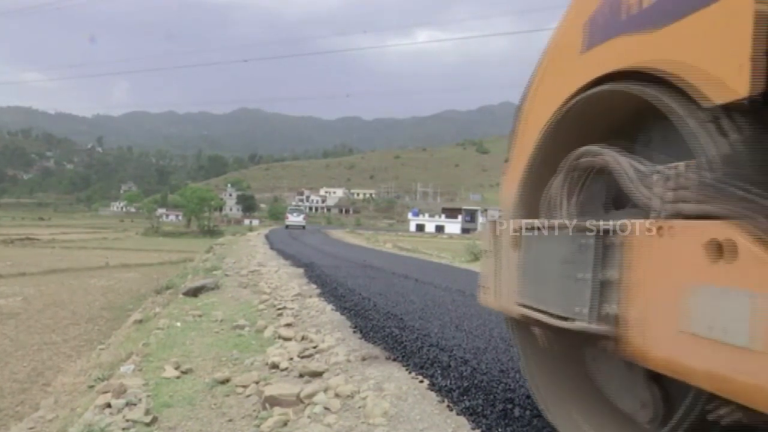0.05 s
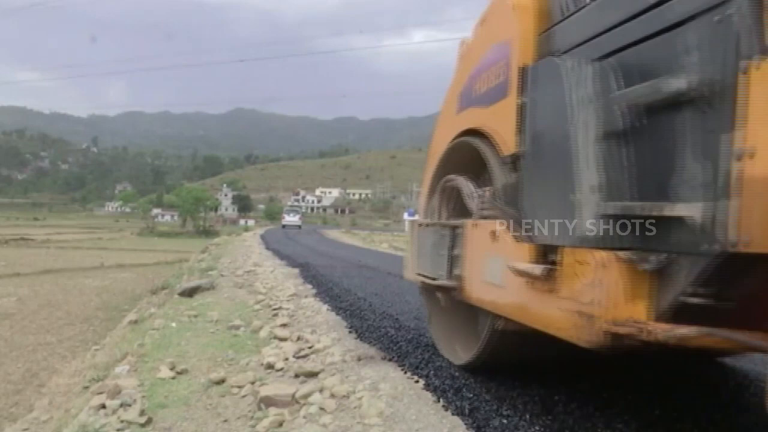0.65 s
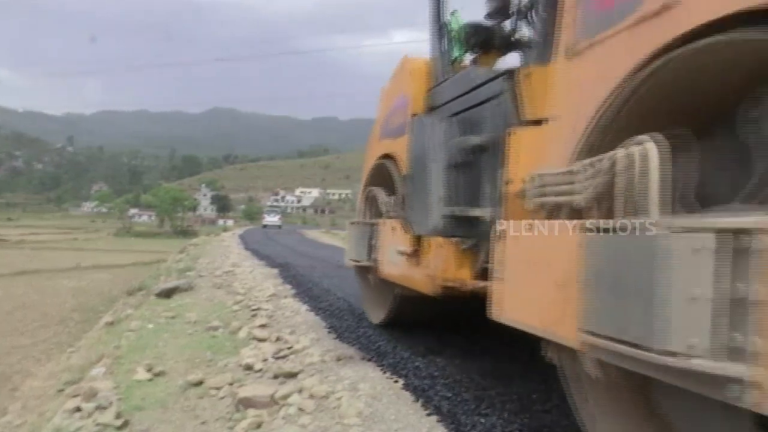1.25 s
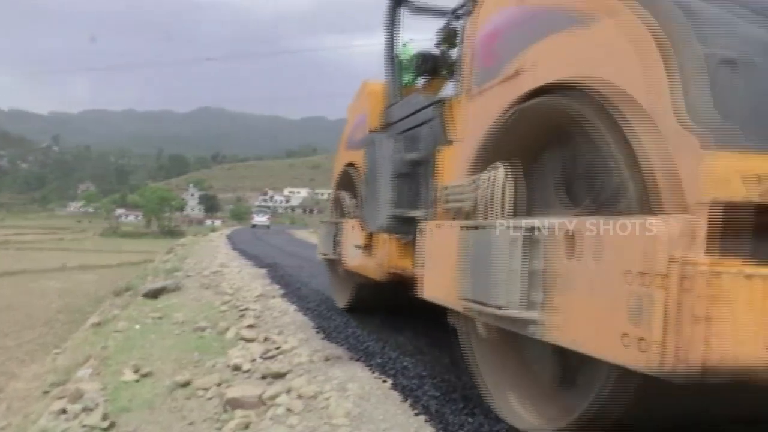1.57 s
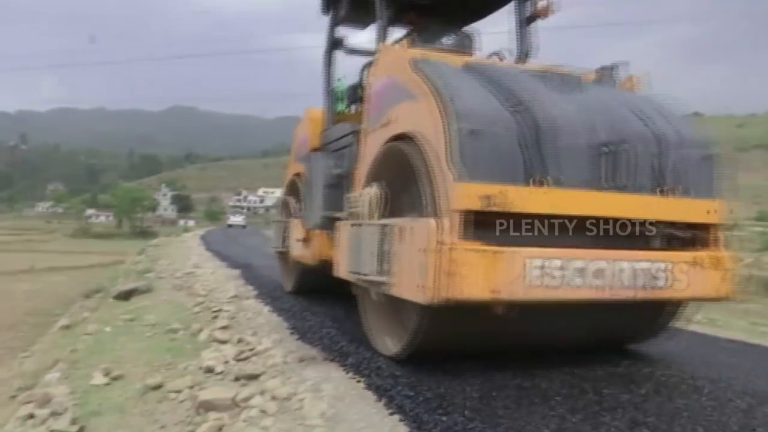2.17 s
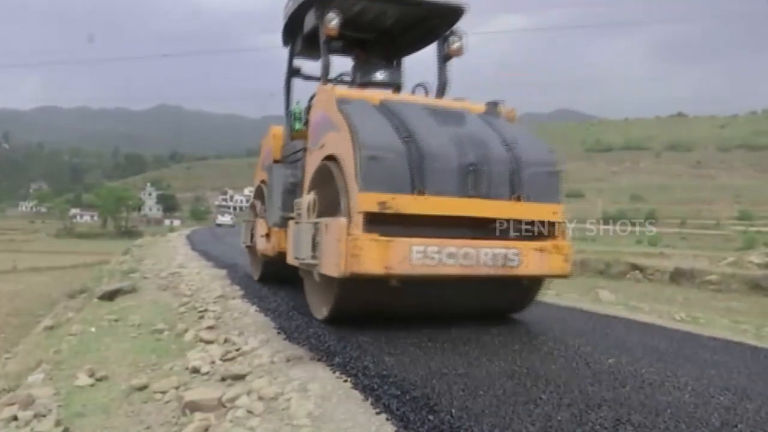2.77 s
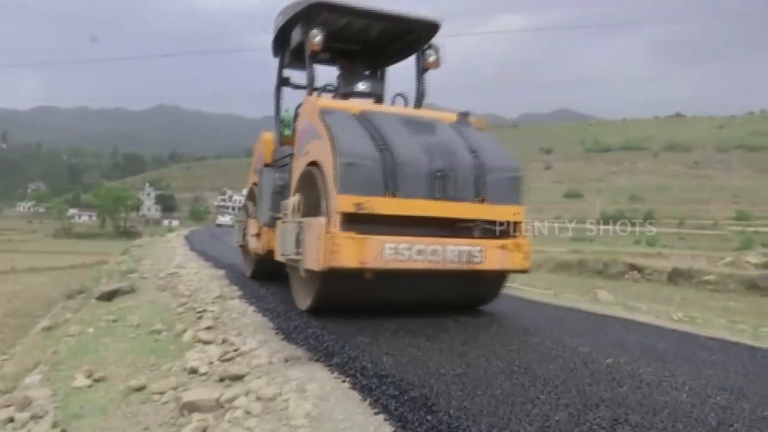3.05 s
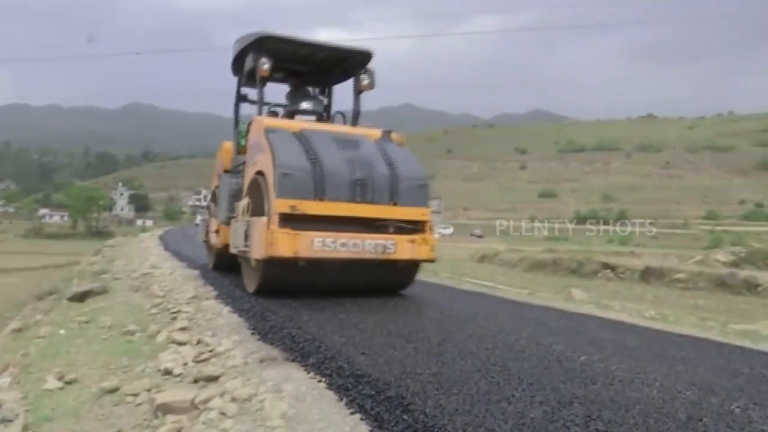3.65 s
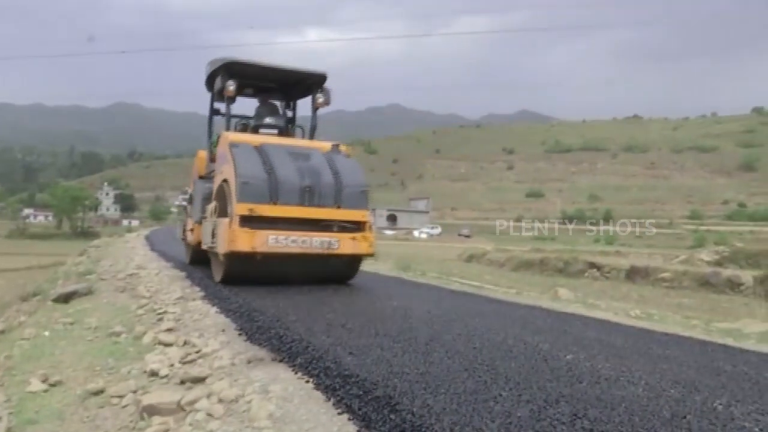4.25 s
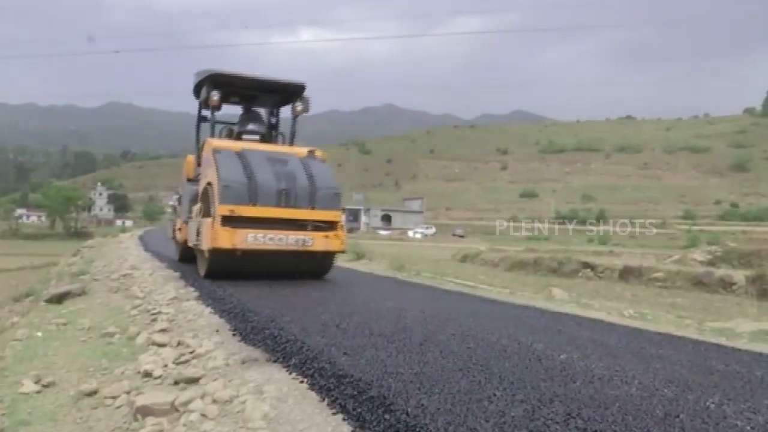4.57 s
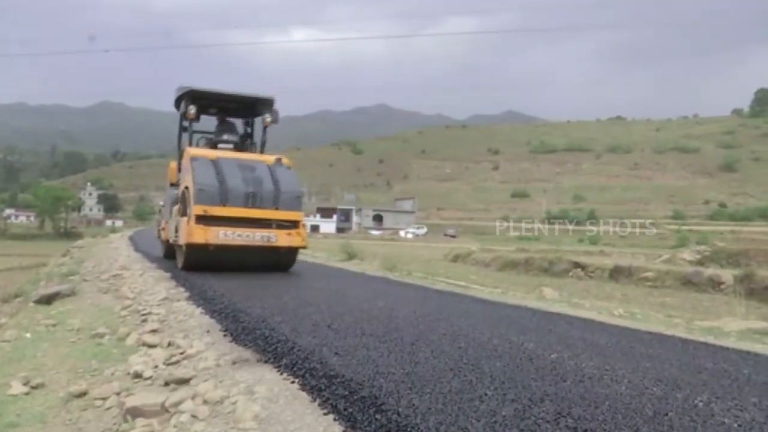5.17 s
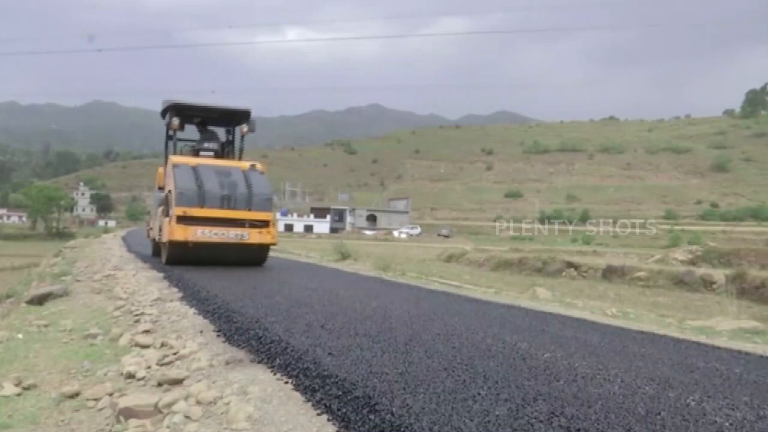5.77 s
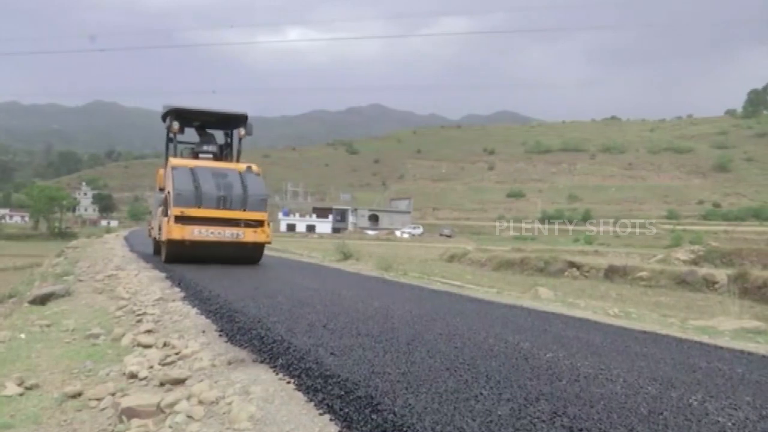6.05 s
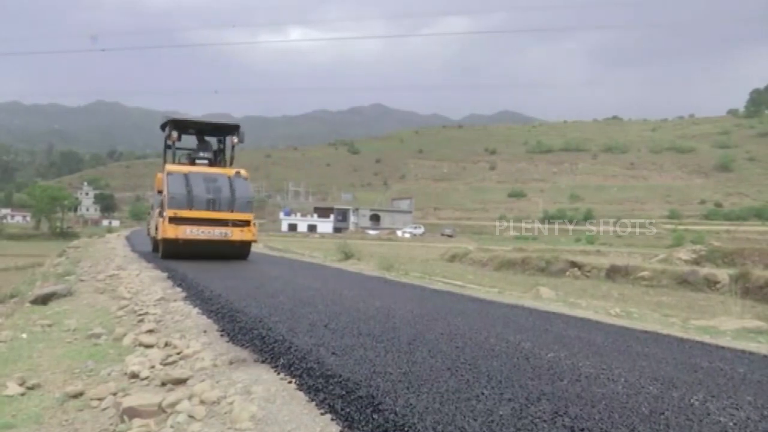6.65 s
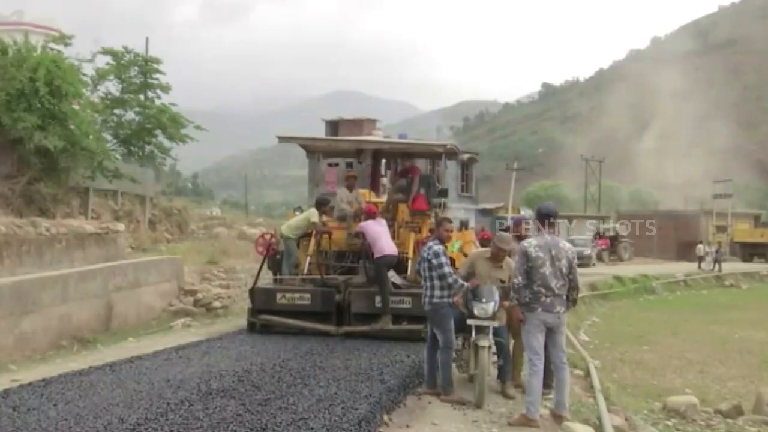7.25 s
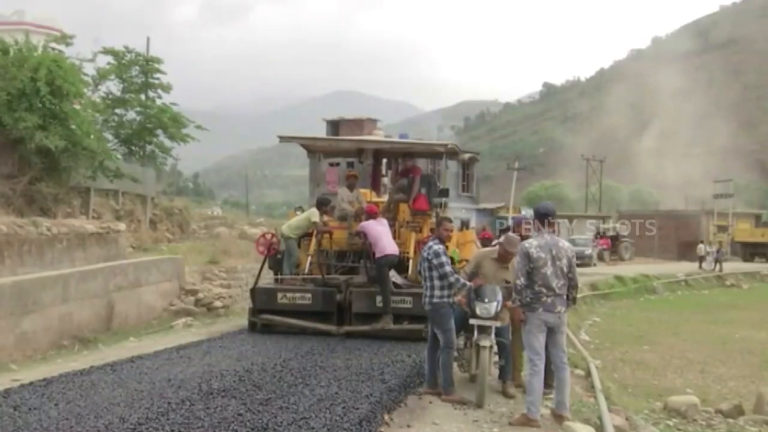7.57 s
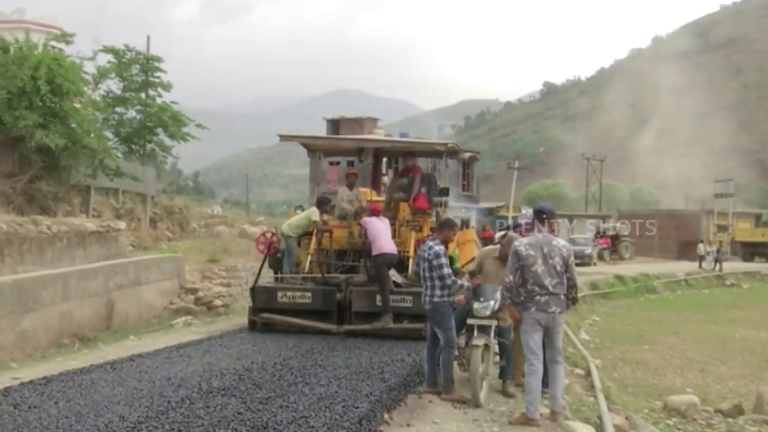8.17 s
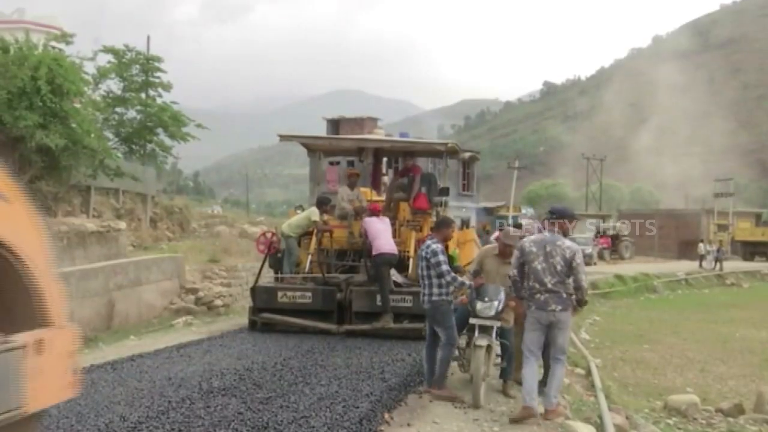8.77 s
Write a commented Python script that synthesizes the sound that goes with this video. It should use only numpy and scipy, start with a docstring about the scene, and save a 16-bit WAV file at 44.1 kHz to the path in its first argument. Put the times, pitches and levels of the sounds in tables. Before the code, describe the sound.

Steady diesel hum and clatter from a passing road roller, with surges of gritty tar hiss and cracking stones, stopping abruptly.

```python
"""Open country, on fresh asphalt: a tandem road roller backs past at arm's length and rolls slowly away.
Its four-cylinder diesel holds one speed; periodic firing makes the exhaust hum, the block knock and
the steel panels resonate, while the fan drones and the hydraulic drive whines. The wet drums hiss in
surges on hot tar, stones crack, and a scraper squeaks and rings. The sound stops dead, leaving only
a faint electronic hiss."""
import sys
import numpy as np
from scipy import signal
from scipy.fft import rfft, irfft, next_fast_len
from scipy.io import wavfile
from scipy.ndimage import uniform_filter1d

SR = 44100
rng = np.random.default_rng(int(sys.argv[2]) if len(sys.argv) > 2 else 0)


def to_wav(sig):
    """Store sig (one row per channel, or 1-D mono) as 16-bit WAV at the path in sys.argv[1].

    Samples outside -1..1 are clipped; the rate is SR.
    """
    pcm = np.clip(np.atleast_2d(sig), -1, 1) * 32767
    pcm = np.round(pcm).astype(np.int16)
    wavfile.write(sys.argv[1], SR, pcm.T)  # frames by channels


N = 397341
T = np.arange(N) / SR


def undb(db):
    """Amplitude ratio of a level in decibels."""
    return 10 ** (np.asarray(db) / 20)


def unit(x):
    """Normalisation to rms 1."""
    return x / np.sqrt(np.mean(x ** 2))


def curves(rows):
    """Linear interpolation of each column over time."""
    times, *columns = np.transpose(rows)
    return [np.interp(T, times, column) for column in columns]


def swell(time, half_length):
    """Gaussian envelope with peak 1."""
    return np.exp(-((T - time) / half_length) ** 2)


def noise():
    """Gaussian white noise."""
    return rng.standard_normal(N)


def wander(rate):
    """Smooth random modulation of rms 1, changing about rate times a second."""
    step = int(SR / rate)
    held = np.repeat(rng.standard_normal(N // step + 1), step)
    return unit(uniform_filter1d(held, step)[:N])


def grains(rate, spread_db):
    """Shot noise: about rate clicks a second, of random size."""
    size = undb(spread_db * np.minimum(rng.exponential(size=N), 6))
    return unit((rng.random(N) < rate / SR) * size * noise())


def filtered(x, response):
    """Linear filtering by a frequency response; rms 1."""
    size = next_fast_len(N + SR // 2)
    f = np.maximum(np.arange(size // 2 + 1) * SR / size, 1)
    return unit(irfft(rfft(x, size) * response(f), size)[:N])


def colour(x, spectrum):
    """Spectral shaping through points (frequency [Hz], relative level [dB])."""
    hz, db = np.transpose(spectrum)
    return filtered(x, lambda f: undb(np.interp(np.log(f), np.log(hz), db)))


def resonance(f, hz, width):
    """Frequency response of a damped oscillator tuned to hz."""
    return 1 / (1 + 1j * (f / hz - hz / f) * hz / width)


def ring(x, modes):
    """Forced vibration of steep-skirted modes (frequency [Hz], nominal width [Hz], gain [dB])."""
    return filtered(x, lambda f: sum(undb(db) * resonance(f, hz, 2 * width) ** 2
                                     for hz, width, db in modes))


def harmonics(cycles, partials, waver_db):
    """Harmonic series on a phase in cycles; each partial wavers in level."""
    return sum(np.sqrt(2) * undb(db + waver_db * wander(6))
               * np.sin(2 * np.pi * (order * cycles + rng.random())) for order, db in partials)


def directivity(x, spectra, times):
    """Directional radiation: one spectrum fades into the next as the listening angle changes."""
    place = np.interp(T, times, np.arange(len(spectra)))
    return sum(np.maximum(1 - abs(place - k), 0) * colour(x, view) for k, view in enumerate(spectra))


def knocks(firings, decay, depth, scatter_db, repeat):
    """Noise modulated by impacts (decay in firing periods); the share repeat recurs every four firings."""
    loose = np.maximum(firings + .2 * wander(45), 0)
    strengths = undb(scatter_db * np.clip(rng.standard_normal(1000), -1.5, 1.5))
    blows = strengths[loose.astype(int)] * np.exp(-(loose % 1) / decay)
    cycle_samples = int(4 * N / firings[-1])
    pattern = noise()[(firings / 4 % 1 * cycle_samples).astype(int)]
    return (np.sqrt(repeat) * pattern + np.sqrt(1 - repeat) * noise()) * (1 + depth * blows)


def reflections(x, echo_db, longest_s, drift_s, count=4):
    """Comb filtering: echoes off frame, drums and road shimmer as their paths shift."""
    lags = [longest_s * (k + rng.random()) / count + drift_s * wander(1.2) for k in range(count)]
    fine = signal.resample_poly(x, 4, 1)
    fine_s = np.arange(len(fine)) / (4 * SR)
    echoes = sum(rng.choice([-1, 1]) * np.interp(T - lag, fine_s, fine) for lag in lags)
    return unit(x + undb(echo_db) * unit(echoes))


# Relative levels as tonal sources pass in and out of view
# (time [s], fan [dB], exhaust pipe [dB], drum shell [dB], hood [dB])
TONE_LEVELS = [(0, -33.5, -58, -47, -43), (.95, -36.5, -41.5, -34.5, -43), (1.2, -41.5, -48, -35.5, -51.5),
               (1.42, -44.5, -50.5, -29.5, -46), (1.9, -41.5, -54, -36.5, -42),
               (2.35, -40.5, -45, -33.5, -42), (2.8, -43.5, -42, -39.5, -40), (3.6, -39, -36.5, -36, -45),
               (4.6, -41, -38.5, -48, -48), (5.1, -42.5, -35.5, -35, -44), (5.6, -43, -36, -39, -52),
               (6.9, -42.5, -35, -42.5, -63)]
# Exhaust partials (order [multiple of crank rate], relative level [dB])
PIPE_PARTIALS = [(4, -1), (5, -10), (6, -6), (7, -11.5)]
# Block partials (order [multiple of crank rate], level [dB])
BLOCK_PARTIALS = [(8, -47.5), (9, -49), (13, -49.5), (16, -51), (18, -47), (22, -50.5), (27, -55),
                  (33, -60.5), (39, -54.5)]

def engine_hum(firings):
    """Periodic excitation: pipe and block radiate harmonics of the crank rate."""
    _, pipe_db, _, _ = curves(TONE_LEVELS)
    crank = firings / 2  # two firings a turn
    pipe = undb(pipe_db - 2.5) * harmonics(crank, PIPE_PARTIALS, waver_db=.5)
    block = harmonics(crank, BLOCK_PARTIALS, waver_db=1.5)
    bay_gain = undb(6 * swell(.78, .44))  # the open engine bay goes by
    return pipe + block + bay_gain * harmonics(firings, [(1, -50.5)], waver_db=1.5)


# Belt slip (time [s], blade rate / firing rate [ratio])
BLADE_RATIO = [(1.0, 3.045), (2.2, 3.075), (4.0, 3.104), (6.0, 3.08)]
# Fan partials (order [multiple of blade rate], relative level [dB])
FAN_PARTIALS = [(1, -0.94), (2, -6), (3, -3)]
# Beaming through the side grille as it turns away (time [s], overtone gain [dB])
GRILLE_GAIN = [(.2, 1), (.7, 1.5), (1.3, 3), (1.7, -6), (5.0, -15)]

def cooling_fan(firing_hz):
    """Blade-passing tone of a belt-driven fan, phase-modulated by gusts through the radiator."""
    fan_db, *_ = curves(TONE_LEVELS)
    ratio, = curves(BLADE_RATIO)
    grille_db, = curves(GRILLE_GAIN)
    gusts = .035 * (wander(11) + .5 * wander(45))
    blades = np.cumsum(ratio * firing_hz) / SR + gusts
    fundamental = harmonics(blades, FAN_PARTIALS[:1], waver_db=1.7)
    overtones = harmonics(blades, FAN_PARTIALS[1:], waver_db=-.5)
    return undb(fan_db) * (fundamental + undb(grille_db) * overtones)


# Relative levels of the engine noise (time [s], roar [dB], clatter [dB])
ENGINE_LEVELS = [(0, -26.5, -28.5), (.6, -28.5, -31), (1.1, -26.5, -28.5), (1.45, -28.5, -31),
                 (1.6, -27.5, -32), (2.4, -26.5, -30.5), (3.2, -27.5, -32), (4.0, -27, -32),
                 (4.7, -29, -35.5), (5.1, -29, -34), (5.8, -30, -37.5), (6.3, -30, -38), (6.6, -31, -41),
                 (6.9, -31.5, -40)]
# Roar from the side, the front corner and far ahead (frequency [Hz], relative level [dB])
ROAR_SIDE_SPECTRUM = [(15, -47), (25, -22), (59, -13), (162, -7), (204, -7.5), (238, -7.5), (428, -6.5),
                      (574, -3), (620, -2), (884, -12), (1000, -15), (1300, -35), (2200, -120)]
ROAR_CORNER_SPECTRUM = [(15, -49), (25, -14), (97, -9.5), (185, -2.5), (223, -11.5), (242, -3.5),
                        (292, -10), (324, -4.5), (356, -4.5), (428, -2), (649, -6), (712, 0.5), (857, -15),
                        (1000, -14.5), (1300, -39), (2200, -120)]
ROAR_FAR_SPECTRUM = [(15, -43), (25, -12), (59, -14), (97, -12.5), (155, -3), (200, -4.5), (222, -12),
                     (238, -3.5), (258, -10), (339, -13.5), (441, -4.5), (500, -5), (620, -3.5),
                     (669, -14.5), (746, -15), (844, -18.5), (1000, -32), (1300, -41), (2200, -120)]

def engine_roar(firings, throb):
    """Combustion noise: each firing stands out slightly from a dense rumble."""
    roar_db, _ = curves(ENGINE_LEVELS)
    thuds = throb * knocks(firings, decay=.31, depth=.2, scatter_db=7, repeat=.046)
    spectra = [ROAR_SIDE_SPECTRUM, ROAR_CORNER_SPECTRUM, ROAR_CORNER_SPECTRUM, ROAR_FAR_SPECTRUM]
    return undb(roar_db - 2) * directivity(thuds, spectra, times=[.8, 2, 3.9, 5.8])


# Modes of drum shell and hood (frequency [Hz], nominal width [Hz], relative level [dB])
SHELL_MODES = [(390, 11, -4), (439.8, 9, 1.5), (502.3, 11.8, -2)]
HOOD_MODES = [(721.3, 5.5, 8), (771, 8.8, -1.5), (791, 14, -3.5), (695, 9, -3)]
# Jolts of the body (time [s], half length [s], rise [dB])
JOLTS = [(2.052, 0.012, 5), (2.267, .04, 2), (2.438, 0.013, 8), (2.65, .06, 1.5), (2.8, .07, 8.5),
         (3.998, .03, 8), (5.704, 0.085, 5), (5.9, .035, 5), (6.3, .025, 9)]

def steel_panels(firings, throb):
    """Forced resonance: the firings shake shell and hood, which boom harder at each jolt."""
    _, _, shell_db, hood_db = curves(TONE_LEVELS)
    shake = throb * knocks(firings, decay=.48, depth=.2, scatter_db=-3.5, repeat=.02)
    shell = undb(shell_db + 1) * ring(shake, SHELL_MODES)
    hood = undb(hood_db + 1.5) * ring(shake, HOOD_MODES)
    jolt_db = sum(db * swell(time, half_length) for time, half_length, db in JOLTS)
    return (shell + hood) * undb(jolt_db)


# Modes of the thin steel covers (frequency [Hz], bandwidth [Hz], relative level [dB])
COVER_MODES = [(1122, 41, -2.5), (2040, 71, -7.5), (2504, 60, 4), (2780, 51, -1), (3090, 41, -2.5),
               (3300, 56, -6.5), (3620, 35.7, -4.5), (3680, 50, -12), (4410, 73, -5), (5000, 99, -1.5),
               (5640, 60, -8), (6080, 60, -4.5)]

def covers(x):
    """Superposition: the covers add their short rings to the direct sound."""
    return filtered(x, lambda f: 1 + sum(undb(db - 12) * resonance(f, hz, width)
                                         for hz, width, db in COVER_MODES))


# Clatter from the side, past the near drum, from the front corner and from far ahead
# (frequency [Hz], relative level [dB])
CLATTER_SIDE_SPECTRUM = [(500, -23), (850, -6), (886, -3), (1100, 1.5), (1250, 1.5), (1670, 0.5),
                         (1940, -3.5), (2470, -3), (2740, -6.5), (3700, -5.5), (4500, -9), (5850, -32),
                         (9900, -120)]
CLATTER_DRUM_SPECTRUM = [(500, -26), (850, -10), (1080, 3.5), (1280, -3), (1620, 0), (1880, -6.5),
                         (2250, -0.5), (2750, -5), (3700, -2.5), (4500, -14), (5850, -30), (9900, -120)]
CLATTER_CORNER_SPECTRUM = [(500, -25), (850, -8), (1060, -6), (1200, -10.5), (1330, 2.5), (1430, .5),
                           (1570, -6), (1770, -12.5), (1990, -5.5), (2190, -3.5), (2650, -7), (3700, -6.5),
                           (4230, -15.5), (4500, -17.5), (5850, -42), (9900, -120)]
CLATTER_FAR_SPECTRUM = [(500, -32), (850, -3), (924, 1), (1180, -2.5), (1300, 3), (1950, -3), (2180, 2),
                        (2900, -1), (3680, -0.5), (4230, -12.5), (4500, -31), (5850, -41), (9900, -120)]
# Loose metalwork rattling harder (time [s], half length [s], rise [dB])
RATTLE_SWELLS = [(1.182, 0.01, 2.5), (1.608, 0.024, 2.5), (2.008, .03, 0.5), (3.58, .015, 1),
                 (3.994, .015, 0.5), (4.16, 0.043, 3), (4.39, 0.011, 2.5), (4.555, 0.026, 2.5),
                 (6.347, 0.084, 3.5)]

def engine_clatter(firings):
    """Impact noise: sharp knocks at the firing rate and stray clicks excite the metalwork."""
    _, clatter_db = curves(ENGINE_LEVELS)
    rattle_db = sum(db * swell(time, half_length) for time, half_length, db in RATTLE_SWELLS)
    gain = undb(clatter_db + rattle_db + .5 * wander(10))
    ticks = unit(knocks(firings, decay=.22, depth=.35, scatter_db=7, repeat=.092))
    ticks += undb(-11) * grains(rate=900, spread_db=1.5)
    ticks *= undb(.68 * wander(30))
    ticks = covers(reflections(ticks, echo_db=-8.5, longest_s=.012, drift_s=.000398))
    spectra = [CLATTER_SIDE_SPECTRUM, CLATTER_DRUM_SPECTRUM, CLATTER_DRUM_SPECTRUM,
               CLATTER_CORNER_SPECTRUM, CLATTER_CORNER_SPECTRUM, CLATTER_FAR_SPECTRUM]
    return gain * directivity(ticks, spectra, times=[1.2, 1.7, 2.9, 3.4, 4.9, 5.55])


# Engine speed (time [s], firing rate [Hz])
FIRING_RATE = [(0, 68.91), (1.5, 68.64), (3.2, 68.72), (4.6, 68.46), (5.6, 68.63), (6.9, 69.16)]

def diesel():
    """Four-stroke cycle: one nearly steady firing rate times all the engine's parts."""
    firing_hz, = curves(FIRING_RATE)
    firings = np.cumsum(firing_hz * (1 + .002 * wander(7))) / SR
    chug_db = 1.05 * np.cos(np.pi * firings / 2)  # one cylinder of the four hits harder
    uneven_db = 1.4 * np.tanh(wander(26))  # no two cycles are equally strong
    throb = undb(chug_db + uneven_db)
    return (engine_hum(firings) + cooling_fan(firing_hz) + engine_roar(firings, throb)
            + steel_panels(firings, throb) + engine_clatter(firings))


# Relative levels between surges, fading with distance (time [s], hiss [dB], sizzle [dB])
DRUM_LEVELS = [(0, -36.5, -50.5), (1.15, -37.5, -48.5), (1.5, -40.5, -52), (2.4, -47.5, -50),
               (3.4, -48, -50.5), (4.7, -46, -53), (5.5, -45, -52.5), (6.2, -48, -55), (6.9, -48, -58.5)]
# Stickier patches of tar (start [s], length [s], hiss rise [dB], sizzle rise [dB])
STICKY_PATCHES = [(0.45, 0.027, 1, 3.5), (0.545, 0.14, 3, 5.5), (0.963, 0.12, 1.5, 1.5),
                  (1.23, 0.056, 7, 4.5), (1.574, 0.15, 6, 5), (1.785, 0.051, 6, 6.5), (1.91, 0.25, 6, 5.5),
                  (2.188, 0.11, 8, 7), (2.22, .045, 1, 2.5), (2.386, 0.042, 6, 6), (2.48, .05, 9, 8),
                  (2.556, 0.15, 6.5, 5.5), (2.947, 0.16, 7, 4.5), (3.028, 0.046, 5, 2), (3.13, .05, 4.5, 2),
                  (3.542, 0.055, 4, 3.5), (3.87, 0.14, 6.5, 7.5), (4.104, 0.17, 6.5, 8),
                  (4.34, 0.12, 2.5, 6), (4.51, 0.081, 1, 3), (4.8, 0.29, 4.5, 5), (5.041, 0.1, 2, 4),
                  (6.317, 0.19, 3.5, 3.5), (6.655, 0.095, 4, 4.5), (6.803, 0.045, 4, 4.5)]
# Near hiss, far hiss and fine sizzle (frequency [Hz], relative level [dB])
HISS_NEAR_SPECTRUM = [(2350, -30.5), (4000, 3), (5090, 4), (5780, 1), (6900, -13.5), (7600, -35.5),
                      (9880, -45.5), (16700, -120)]
HISS_FAR_SPECTRUM = [(2350, -26.5), (4000, 6), (4250, -6.5), (4390, 1), (5800, 3.5), (6350, -3.5),
                     (6890, -21), (7200, -42), (9360, -49), (15800, -120)]
SIZZLE_SPECTRUM = [(4120, -33), (7000, -11.5), (7290, -6.5), (9120, 1.5), (9810, 1.5), (10300, -0.5),
                   (11100, -10), (12100, -2.5), (12700, -5.5), (14700, -28.5), (15600, -34.5)]

def drums(attack_s=.015, release_s=.03):
    """Adhesion noise: wet steel peels off hot tar with a gritty hiss that surges where it sticks."""
    hiss_db, sizzle_db = curves(DRUM_LEVELS) + .68 * wander(25)  # stickiness also varies at random
    for start, length, hiss_rise_db, sizzle_rise_db in STICKY_PATCHES:
        ramps = np.minimum((T - start) / attack_s, (start + length - T) / release_s)
        patch = np.clip(ramps + .5, 0, 1)
        hiss_db += hiss_rise_db * patch
        sizzle_db += sizzle_rise_db * patch
    grit = noise() + undb(-8) * grains(rate=1600, spread_db=.5)
    grit *= undb(wander(40))
    grit = covers(reflections(grit, echo_db=-7.5, longest_s=.008, drift_s=.000289))
    far = np.interp(T, [2.4, 4.2], [0, 1])
    hiss = (1 - far) * colour(grit, HISS_NEAR_SPECTRUM) + far * colour(grit, HISS_FAR_SPECTRUM)
    sizzle = colour(grit, SIZZLE_SPECTRUM)
    spray_db = -53 + 2 * (sizzle_db + 39.5)  # the finest spray swells faster, brightening the surges
    spray = ring(grains(rate=6100, spread_db=1), [(13400, 1600, 0)])
    return undb(hiss_db) * hiss + undb(sizzle_db + .43) * sizzle + undb(spray_db) * spray


# Swells of the whine (time [s], half length [s], relative level [dB])
WHINE_SWELLS = [(1.43, 0.061, -34.5), (1.805, 0.17, -30.5), (2.138, 0.1, -32), (2.98, 0.2, -33.5),
                (5.1, .1, -40)]

def hydraulic_drive(pitch_hz=365):
    """Frequency and amplitude modulation: the drive's one unsteady note swells now and then."""
    swells = sum(undb(db) * swell(time, half_length) for time, half_length, db in WHINE_SWELLS)
    cycles = np.cumsum(pitch_hz * (1 + .005 * wander(22))) / SR
    return (undb(-55) + swells) * harmonics(cycles, [(1, -1.8)], waver_db=-1)


# Stones crushed under a drum (time [s], relative level [dB], decay [s], centre frequency [Hz])
STONE_BURSTS = [(1.592, -31, 0.025, 4400), (1.991, -26, 0.037, 1240), (2.285, -33, .015, 1000),
                (2.43, -32, .018, 1100), (3.648, -39, 0.011, 10100), (4.145, -34.5, .018, 2400),
                (6.221, -33, 0.0039, 2593), (6.341, -27.5, 0.013, 3200)]

def stones():
    """Brittle fracture: a chipping bursts in a spray of cracks, the smaller the brighter."""
    tar_muffling = [(6000, -5), (7200, -11), (11000, -8), (15000, -24.5)]
    cracks = colour(grains(rate=10100, spread_db=2), tar_muffling)
    out = np.zeros(N)
    for time, db, decay, hz in STONE_BURSTS:
        burst = (T >= time) * np.exp(-np.abs(T - time) / decay)
        out += undb(db) * np.std(burst) * ring(cracks * burst, [(hz, 600 + .192 * hz, 0)])
    return out


# Metal squeaks (time [s], half length [s], frequency [Hz], level [dB])
SCRAPER_SQUEAKS = [(1.945, 0.039, 4380, -41), (1.951, 0.047, 2275, -42)]

def scraper_squeaks():
    """Stick-slip friction: a scraper blade catches on the drum and sounds briefly."""
    out = np.zeros(N)
    for time, half_length, hz, db in SCRAPER_SQUEAKS:
        cycles = np.cumsum(hz * (1 + .0052 * wander(150))) / SR
        out += undb(db) * swell(time, half_length) * harmonics(cycles, [(1, 0)], waver_db=2.5)
    return out


# Moments when the hood faces the listener (time [s], half length [s], level [dB])
HOOD_SWELLS = [(2.29, .1, -40.5), (2.8, .15, -37.5), (3.35, .14, -38.5), (4.1, .5, -48)]

def hood_tone(pitch_hz=714):
    """Directional radiation: the hood's main resonance sings out while it faces the listener."""
    tone = harmonics(pitch_hz * T + .09 * wander(18), [(1, 0)], waver_db=.5)
    return tone * sum(undb(db) * swell(time, half_length) for time, half_length, db in HOOD_SWELLS)


# Modes of the steel scraper (frequency [Hz], level [dB], time to fall 60 dB [s])
SCRAPER_MODES = [(2229, -47, .5), (2751, -43, .3), (3052, -43, .2), (3720, -43, .7), (4492, -43, 1.1),
                 (5615, -48, .7)]

def scraper_clink(strike_s=6.343):
    """Free vibration: flicked by a stone, the scraper rings in exponentially decaying modes."""
    since = np.maximum(T - strike_s, 0)
    return sum(undb(db - 60 * since / t60) * np.sin(2 * np.pi * hz * since)
               for hz, db, t60 in SCRAPER_MODES)


# Electronic hiss (frequency [Hz], relative level [dB])
FLOOR_SPECTRUM = [(12, -0.5), (20, -5), (32, -10.5), (259, -14), (632, -13), (687, -14), (10200, -13.5),
                  (15600, -15.5)]

def electronic_hiss():
    """Noise floor: steady broadband hiss over a faint rumble."""
    hiss = undb(-64.5) * colour(noise(), FLOOR_SPECTRUM)
    rumble = undb(-88 + 1.5 * wander(8)) * ring(noise(), [(60, 91, 0)])
    return hiss + rumble


def scene():
    """Superposition: the roller's sources add and are cut off together; the electronic hiss stays."""
    stop_s, fade_s = 6.893, .002
    gate = np.clip((stop_s - T) / fade_s + .5, 0, 1)
    roller = (diesel() + drums() + hydraulic_drive() + stones()
              + scraper_squeaks() + hood_tone() + scraper_clink())
    return (gate * roller + electronic_hiss())[None]


def record(dry):
    """Band limiting: a steep low-pass filter removes the highest treble."""
    cutoff_hz = 15500
    return signal.sosfilt(signal.ellip(10, .1, 80, cutoff_hz, fs=SR, output="sos"), dry)


dry = scene()
out = record(dry)
to_wav(out)
```